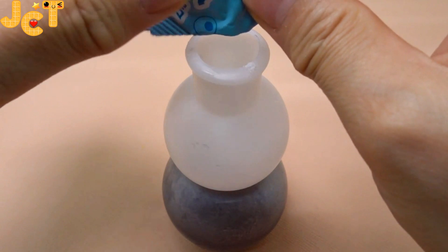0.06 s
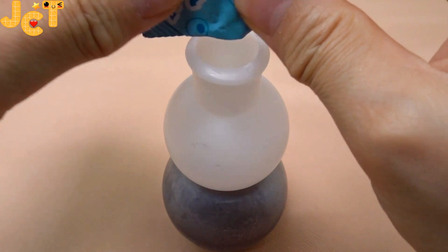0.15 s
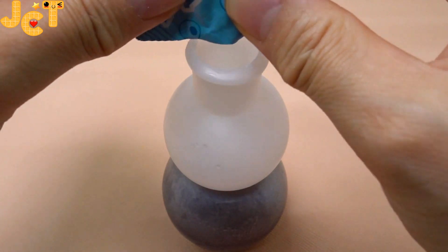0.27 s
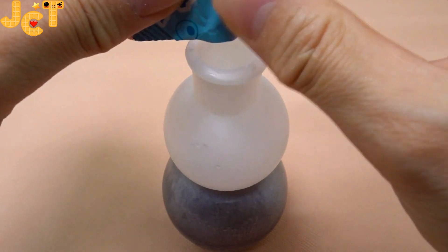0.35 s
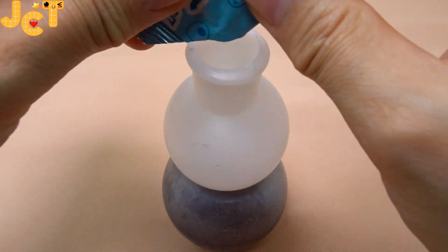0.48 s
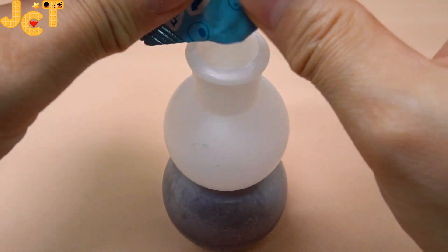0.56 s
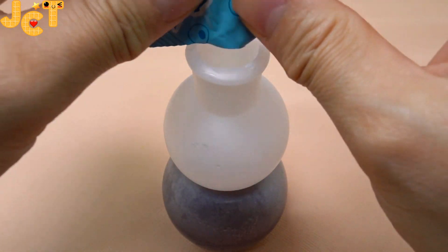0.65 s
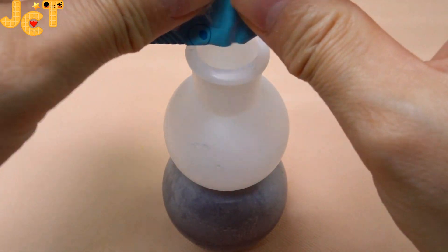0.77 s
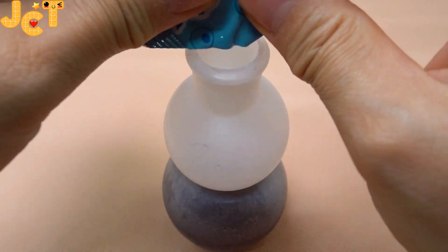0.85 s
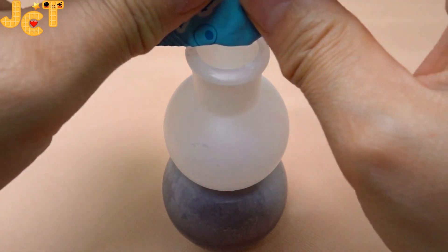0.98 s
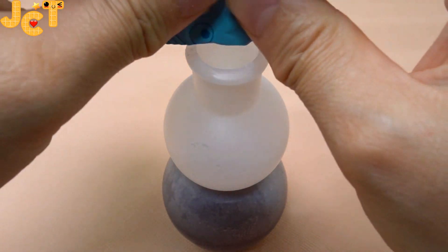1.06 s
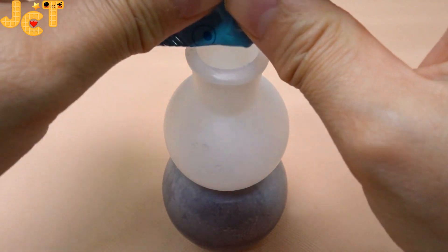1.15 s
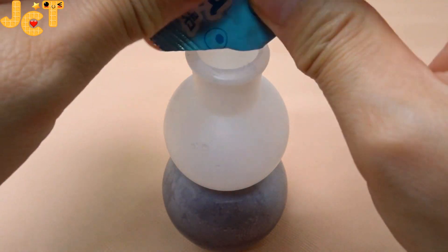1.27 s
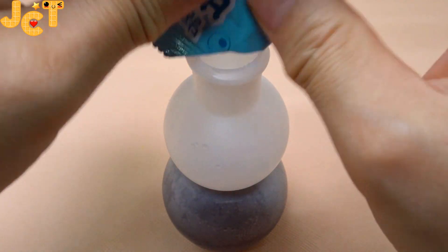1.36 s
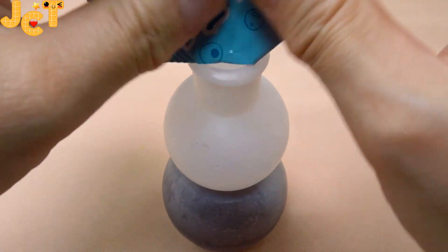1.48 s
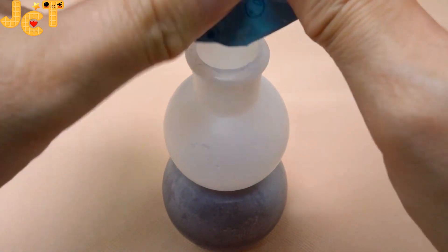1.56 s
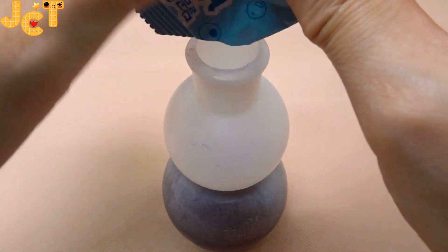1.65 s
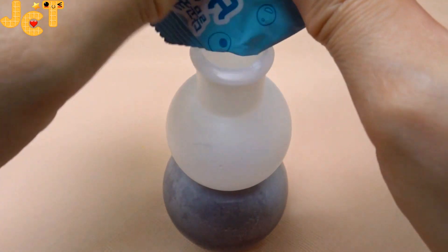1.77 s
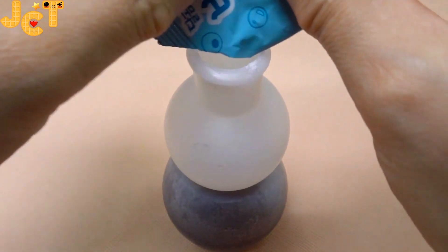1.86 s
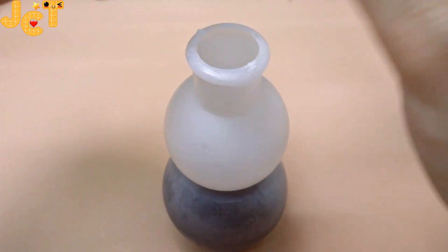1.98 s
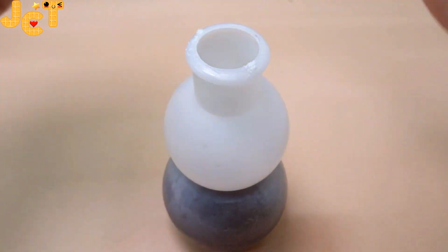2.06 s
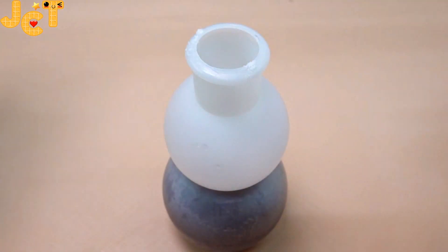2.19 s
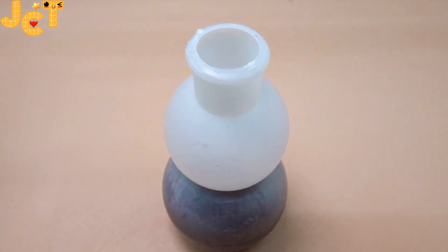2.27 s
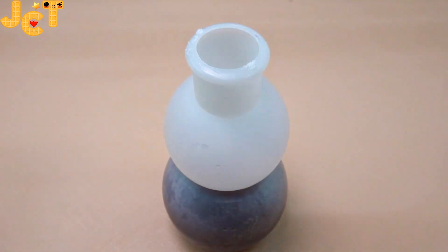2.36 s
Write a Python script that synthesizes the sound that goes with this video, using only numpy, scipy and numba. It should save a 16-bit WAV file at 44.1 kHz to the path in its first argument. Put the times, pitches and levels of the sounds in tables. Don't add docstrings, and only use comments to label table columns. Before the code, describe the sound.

Thin plastic sachet crackling sharply in fingers as powder patters into a small plastic flask, then stopping

```python
import sys
import numpy as np
from scipy import signal
from scipy.fft import rfft, irfft
from scipy.io import wavfile
from scipy.ndimage import uniform_filter1d
from numba import njit

SR = 44100
rng = np.random.default_rng(int(sys.argv[2]) if len(sys.argv) > 2 else 0)


def dump_mix(stems):
    frames = np.atleast_2d(stems).T
    limited = np.clip(frames, -1, 1)
    pcm = np.round(limited * 32767).astype(np.int16)
    wavfile.write(sys.argv[1], SR, pcm)


def ratio(d):
    e = np.asarray(d, float) / 20
    return 10 ** e


N = 105840
TIME = np.arange(N) / SR
WIDE = 0.44


@njit
def band_pass(x, hz, width):
    y, band, low = np.empty(len(x)), 0., 0.
    g, k = np.tan(np.pi * hz / SR), width / hz
    for i in range(len(x)):
        v = (band + g * (x[i] - low)) / (1 + g * (g + k))
        band, low, y[i] = 2 * v - band, low + 2 * g * v, k * v
    return y


@njit
def rings(n, at, hz, q, left, right, lag):
    out = np.zeros((2, n + 2000))
    for e in range(len(at)):
        w = 2 * np.pi * hz[e] / SR
        for i in range(min(int(14 * q / w) + 2, 1900)):
            for c in range(2):
                u = i - (at[e] % 1) - max(lag[e] * (1 - 2 * c), 0.)
                if u > 0:
                    level = left[e] if c == 0 else right[e]
                    fade = min(u * w / 5, 1.) * np.exp(-u * w / (2 * q))
                    out[c, int(at[e]) + i] += level * fade * np.sin(w * u)
    return out[:, :n]


def unit(x):
    return x / np.sqrt(np.mean(x ** 2))


def colour(x, points):
    hz, db = np.array(points, float).T
    grid = np.log(np.linspace(1, SR / 2, 2049))
    cepstrum = irfft(np.interp(grid, np.log(hz), db) * np.log(10) / 20)
    cepstrum[1:2048] *= 2
    cepstrum[2049:] = 0
    response = irfft(np.exp(rfft(cepstrum)))
    return signal.fftconvolve(x, response[None], axes=1)[:, :N]


def pair(wide):
    mid, side = rng.standard_normal((2, N))
    treble = side - .75 * uniform_filter1d(side, size=9)
    return mid + wide * treble * np.array([[1], [-1]])


def walk(size):
    once = uniform_filter1d(rng.standard_normal(N), size=size)
    return unit(uniform_filter1d(once, size=size))


def decay(at, size, tau_s):
    kick = np.bincount(np.clip(at, 0, N - 1).astype(int), size, N)
    return signal.lfilter([1], [1, -np.exp(-1 / (tau_s * SR))], kick)


PAN_DB, PAN_SCATTER_DB, LAG_S = 1.5, 2.5, .00002
BASS_HZ = 900


def clicks(t, db, hz, q):
    place, sign = rng.standard_normal((len(t), 2)).T
    pan_db = (PAN_DB + PAN_SCATTER_DB * place) / 2
    g = ratio(db) * np.sign(sign)
    at = np.clip(t * SR, 0, N - 1)
    pitch = np.clip(hz, 100, 16000.)
    out = rings(N, at, pitch, 1. * q, g * ratio(pan_db), g * ratio(-pan_db), -place * LAG_S * SR)
    return signal.sosfilt(signal.butter(2, BASS_HZ, "high", fs=SR, output="sos"), out)


# (frequency [Hz], level [dB per Hz])
ROOM_TONE = [(18, -53), (30, 8.5), (473, 8), (1500, -27), (1760, -26), (11400, -15), (16000, -40)]
ROOM_DB = -67.5


def room():
    return ratio(ROOM_DB) * unit(colour(pair(.6), ROOM_TONE))


BUMP_CYCLES, RUB_FLICKER_DB = 2.1, 1.8
# (time [s], peak level [dB], body pitch [Hz])
FINGER_BUMPS = [(.059, -35.5, 370), (0.217, -36.5, 350), (0.508, -33, 340), (.554, -41.5, 460),
                (.861, -40, 705), (1.044, -48, 260), (1.635, -41, 483), (1.693, -31, 390),
                (1.836, -51.5, 350), (2.076, -30.5, 715), (2.088, -35, 312)]
# (time [s], level [dB])
FINGER_RUB = [(0, -56), (.2, -64), (.28, -47), (.38, -59), (.44, -59.5), (1.0, -63), (1.07, -58),
              (1.3, -62.5), (1.7, -57), (2.1, -57), (2.2, -65)]


def hands():
    skin = unit(np.array([band_pass(v, 260., 500.) for v in pair(1)]))
    bumps = 0
    for start, db, hz in FINGER_BUMPS:
        since = TIME - start
        swell = np.sin(np.pi * np.clip(since * hz / BUMP_CYCLES, 0, 1))
        bumps = bumps + ratio(db) * (np.sin(2 * np.pi * hz * since) + skin / 1.8) * swell
    rub_db = np.interp(TIME, *np.array(FINGER_RUB).T) + RUB_FLICKER_DB * walk(size=500)
    rub = ratio(rub_db) * skin
    return signal.sosfilt(signal.butter(2, 110, "high", fs=SR, output="sos"), bumps + rub)


NECK_HZ, NECK_WIDTH_HZ, NECK_FROM_FILM_DB = 885, 75, -1
SLUG_RISE_S, SLUG_S = 0.00067, 0.011
WALL_WIDTH_HZ, WALL_DB = 57, -3.5
# (time [s], level [dB], neck pitch [Hz])
POWDER_SLUGS = [(.002, -49.5, 885), (0.022, -45, 940), (0.068, -43, 910), (.219, -40, 905),
                (.271, -44.5, 820), (0.333, -43, 910), (.37, -41, 856), (0.51, -33, 962), (.62, -43, 917),
                (1.005, -44, 927), (1.137, -50, 900), (1.263, -42.5, 910), (1.385, -41.5, 958),
                (1.541, -38.5, 815), (1.69, -35.5, 890), (1.644, -29.5, 866), (1.656, -35, 850),
                (1.772, -43, 880), (1.998, -43.5, 880), (2.043, -49.5, 925), (2.073, -38, 843)]
WALL_PITCHES = [1470, 2050, 2600, 2990, 3670, 4200]


def neck(x, hz):
    return band_pass(band_pass(x, 1. * hz, 1. * NECK_WIDTH_HZ), 1. * hz, 2. * NECK_WIDTH_HZ)


def flask(near):
    mid = near.mean(axis=0)
    hum = 0
    for start, db, hz in POWDER_SLUGS:
        since = TIME - start
        fall = np.clip(since / SLUG_RISE_S, 0, 1) * np.exp(-np.clip(since / SLUG_S, 0, 9) ** 2)
        slug = neck(fall * rng.standard_normal(N), hz)
        hum = hum + ratio(db) * slug / np.abs(slug).max()
    wall = 0
    for k, hz in enumerate(WALL_PITCHES):
        wall = wall + (-1) ** k * band_pass(mid, 1. * hz, 1. * WALL_WIDTH_HZ)
    kick = np.abs(mid) * rng.standard_normal(N)
    return hum + ratio(WALL_DB) * wall + ratio(NECK_FROM_FILM_DB) * neck(kick, NECK_HZ)


GRAIN_SCATTER_DB, GRAIN_Q, HISS_DB, FLICKER_DB = 6.5, 4, -6, 5
POUR_ENDS_S = 2.1
# (time [s], level [dB])
POWDER_FLOW = [(0, -52), (.2, -52), (.35, -43), (0.499, -62), (.68, -43.5), (.95, -49.5), (1.1, -46),
               (1.5, -45.5), (1.65, -36.5), (1.75, -49), (1.808, -51.5), (1.899, -43), (2.031, -52),
               (2.14, -55.5), (2.27, -63.5), (2.4, -67)]


def powder(film, count=3500):
    u = rng.random((count, 3))
    t = u[:, 0] * N / SR
    largest = 2.6 - 1.6 * (t > POUR_ENDS_S)
    size_db = GRAIN_SCATTER_DB * np.minimum(-np.log(u[:, 1]), largest) + 10 * u[:, 2]
    grains = clicks(t, size_db, 2200 * 8.3 ** u[:, 2], GRAIN_Q)
    hiss = np.array([band_pass(v, 5140.0, 16500.0) for v in pair(WIDE)])
    shake = np.log(uniform_filter1d(film[0] ** 2, size=700, origin=250) + 1e-6)
    flicker = np.clip(unit(shake - shake.mean()), -2, 2) * (np.arange(N) < POUR_ENDS_S * SR)
    flow_db = np.interp(TIME, *np.array(POWDER_FLOW).T) + FLICKER_DB * flicker
    return ratio(flow_db) * (unit(grains) + ratio(HISS_DB) * unit(hiss))


SNAP_S, SNAP_DB, TAIL_S, TAIL_DB, CREAK_S, CREAK_DB = .0003, -0.5, 0.0027, -10, 0.0017, -16
PATCH_OCTAVES, PATCHY_DB, SKIRT = .6, 2, 2.6
RING_SHARE_DB, RING_Q, FOLD_Q = -3.5, 8, 6.8
TICK_SPREAD_S, TICK_DB, TICK_SCATTER_DB, TICK_Q = .005, -29, 3, 5
# (time [s], peak level [dB], ring pitch [Hz])
CREASE_SNAPS = [(0.0226, -24, 7840), (0.0702, -21.5, 6900), (0.0753, -28, 13500), (0.1145, -36, 3470),
                (0.1247, -22, 6350), (0.1763, -20, 5300), (0.208, -24, 9900), (0.2103, -26, 5100),
                (0.2194, -26.5, 3230), (0.244, -26, 11800), (0.2788, -17.5, 5800), (0.321, -13, 5260),
                (0.3453, -15, 5730), (0.3497, -20.5, 11200), (0.3762, -17.5, 5900), (0.3892, -18, 5650),
                (0.418, -34, 4200), (0.433, -18.5, 4370), (0.4511, -18, 9500), (0.47, -20.5, 7900),
                (0.478, -21, 9060), (0.48, -22, 6700), (0.4833, -23, 8400), (0.4887, -24, 7260),
                (0.4986, -18, 7060), (0.5015, -12, 8000), (0.5115, -10.5, 3920), (0.534, -9.5, 2810),
                (0.5462, -13.5, 6650), (0.5563, -19, 7700), (0.6, -17.5, 9200), (0.6081, -18.5, 4050),
                  (0.6198, -10, 11700), (0.7153, -13.5, 6700), (0.7197, -12.5, 4240), (0.7345, -20.5, 5800),
                  (0.7484, -20, 5140), (0.7646, -12.5, 4900), (0.771, -14.5, 6500), (0.7965, -18, 3370),
                  (0.8368, -22, 9400), (0.8408, -19, 3960), (0.8609, -8, 6800), (0.888, -11, 2740),
                  (0.8935, -19.5, 4030), (0.9374, -13, 9700), (0.9579, -11, 5420), (1.0043, -15.5, 5400),
                  (1.0122, -16.5, 3260), (1.0676, -15, 7600), (1.0904, -11.5, 7660), (1.0991, -9.5, 10500),
                  (1.114, -18.5, 11700), (1.1341, -24.5, 9200), (1.1379, -19, 4260), (1.1734, -18, 7000),
                (1.1906, -19, 4330), (1.1941, -18.5, 4200), (1.228, -23, 4900), (1.254, -17.5, 5230),
                 (1.262, -44, 6360), (1.2824, -24, 6000), (1.2895, -14, 11000), (1.29, -36, 9800),
                 (1.3038, -20, 7140), (1.3108, -24.5, 8500), (1.3344, -33, 8300), (1.3474, -23.5, 6900),
                 (1.3515, -33, 10300), (1.365, -22.5, 5740), (1.4102, -15.5, 6440), (1.4146, -14, 6200),
                 (1.4274, -13.5, 8100), (1.4367, -20.5, 6900), (1.447, -10.5, 8500), (1.4512, -19, 8800),
                 (1.504, -28.5, 6400), (1.522, -14, 6600), (1.5488, -11.5, 4370), (1.569, -13.5, 8500),
                 (1.5797, -34, 7800), (1.6007, -12.5, 11400), (1.607, -11, 5600), (1.6342, -6, 6650),
                (1.639, -17, 6640), (1.6416, -21, 9800), (1.645, -17, 9900), (1.6482, -23, 4770),
                (1.6549, -12.5, 4840), (1.6858, -13.5, 8600), (1.697, -15.5, 6700), (1.7173, -16, 5270),
                (1.7304, -18, 9900), (1.7588, -24, 5200), (1.7759, -13, 4730), (1.8401, -10.5, 8800),
                (1.8649, -13.5, 8850), (1.8732, -13, 7100), (1.9087, -17, 9800), (1.929, -13.5, 5250),
                (1.9453, -18, 8800), (1.9535, -14, 3340), (1.9558, -13, 5660), (1.9751, -22.5, 5100),
                (1.9948, -21, 5900), (1.9991, -23.5, 4700), (2.0658, -27, 3480), (2.0754, -21, 5400),
                (2.079, -25.5, 3500), (2.0856, -23.5, 4970), (2.1776, -35.5, 5430), (2.302, -30, 5620)]
# (time [s], peak level [dB], ring pitch [Hz])
SMALL_CREASES = [(0.0643, -31, 8400), (0.159, -43, 1800), (0.2744, -28, 4540), (0.304, -33, 2470),
                 (0.4683, -30, 11670), (.647, -35, 2480), (.6765, -37, 3700), (0.7625, -15, 3650),
                 (.786, -37, 6100), (0.82, -35, 13490), (0.8516, -28, 13210), (0.858, -26, 9240),
                 (0.923, -32.5, 2400), (0.9527, -23, 7100), (0.9898, -33, 6660), (1.0501, -21, 4000),
                 (1.1064, -22, 5000), (1.1093, -23, 4720), (1.2847, -25.5, 3570), (1.326, -46, 12610),
                 (1.3573, -24.5, 6000), (1.387, -29.5, 2600), (1.4, -34, 6960), (1.4323, -20, 4940),
                 (1.457, -22.5, 4670), (1.4913, -28, 4850), (1.5418, -21, 6600), (1.5927, -23, 5900),
                 (1.674, -25, 8390), (1.804, -45, 8620), (1.8553, -20.5, 5700), (2.0064, -31, 4380),
                 (2.051, -31.5, 3300)]
# (time [s], peak level [dB], ring pitch [Hz])
LAST_GRAINS = [
    (2.116, -38, 5000),
    (2.127, -38, 1900),
    (2.211, -41.5, 4230),
    (2.2603, -44.5, 2850),
    (2.304, -45, 2120),
]
# (time [s], peak level [dB], ring pitch [Hz])
WIDE_FOLDS = [(0.115, -34.5, 1860), (0.175, -31, 1570), (0.275, -23.5, 2050), (0.3318, -30, 1100),
              (0.368, -28, 1470), (0.5295, -21, 2380), (0.6731, -29, 2100), (0.7499, -31, 1970),
              (.77, -19, 2010), (.84, -27, 2050), (1.0521, -34, 1580), (1.2654, -43, 2490),
              (1.4104, -21.5, 1950), (1.5359, -29, 1530), (1.541, -33, 1440), (1.696, -34, 1500),
              (2.0799, -31, 2040)]
# (frequency [Hz], level [dB])
FILM_TONE = [(200, -48), (600, -12.5), (1400, -6.5), (2600, -3.5), (4500, -6), (9000, -5), (13000, 2),
             (16500, -10)]


def sachet(count=5):
    squeezes = CREASE_SNAPS
    t, db, hz = np.array(squeezes + SMALL_CREASES + LAST_GRAINS, float).T
    db, at, crack = db + SNAP_DB, t * SR, 0
    patch = np.clip(rng.standard_normal((len(t), 8)).T, -3, 1.2)
    for band, luck in zip(700 * 1.55 ** np.arange(8), patch):
        off_pitch = np.minimum((np.log2(band / hz) / PATCH_OCTAVES) ** 2, SKIRT)
        g = ratio(db - 3.43 * off_pitch + PATCHY_DB * luck)
        tail = ratio(TAIL_DB) * decay(at, g, TAIL_S)
        creak = ratio(CREAK_DB) * decay(N - at, g, CREAK_S)[::-1]
        env = decay(at, g, SNAP_S) + tail + creak
        rough = [np.sign(v) * np.abs(v) ** .5 * env for v in pair(WIDE)]
        snap = [band_pass(band_pass(v, band, band * .5), band, band * .5) for v in rough]
        crack = crack + np.array(snap) * 3
    crack = colour(crack, FILM_TONE) * ratio([[PAN_DB / 2], [-PAN_DB / 2]])
    ringing = clicks(t, db + RING_SHARE_DB, hz, RING_Q)

    u = rng.random((len(t), count, 3))
    late = -np.log(u[..., 0]) * TICK_SPREAD_S - .0015
    size_db = np.minimum(-np.log(u[..., 1]), 3) * TICK_SCATTER_DB + 8 * u[..., 2]
    tick_t = (t[:, None] + late).ravel()
    tick_db = (db[:, None] + TICK_DB + size_db).ravel()
    ticks = clicks(tick_t, tick_db, (1800 * 8. ** u[..., 2]).ravel(), TICK_Q)
    return crack + ringing + ticks + clicks(*np.array(WIDE_FOLDS).T, FOLD_Q)


def scene():
    film = sachet()
    near = film + powder(film)
    return room() + hands() + flask(near) + near


def top_cut(x):
    return signal.sosfilt(signal.butter(12, 17150, fs=SR, output="sos"), x)


def record(dry):
    cut = signal.sosfilt(signal.ellip(10, .3, 70, 15950, fs=SR, output="sos"), dry)
    return top_cut(cut)


dry = scene()
out = record(dry)
dump_mix(out)
```